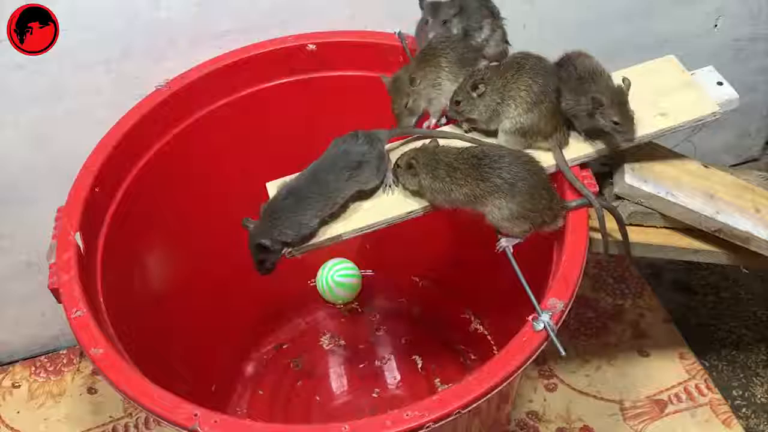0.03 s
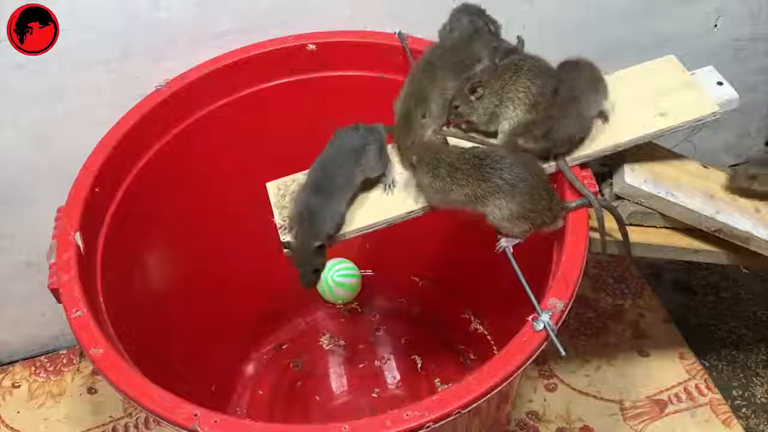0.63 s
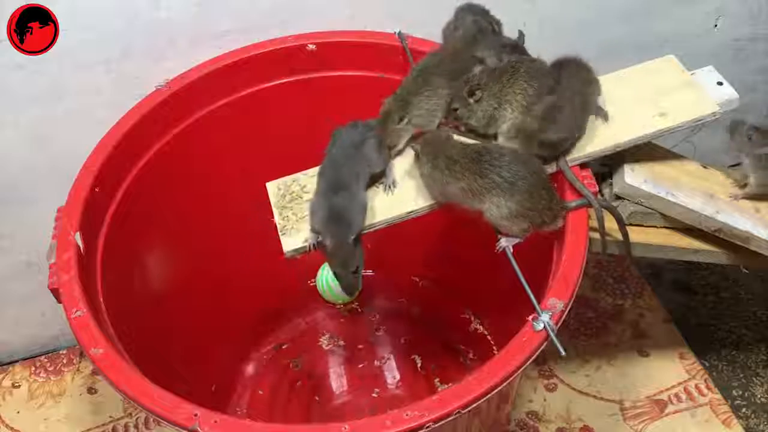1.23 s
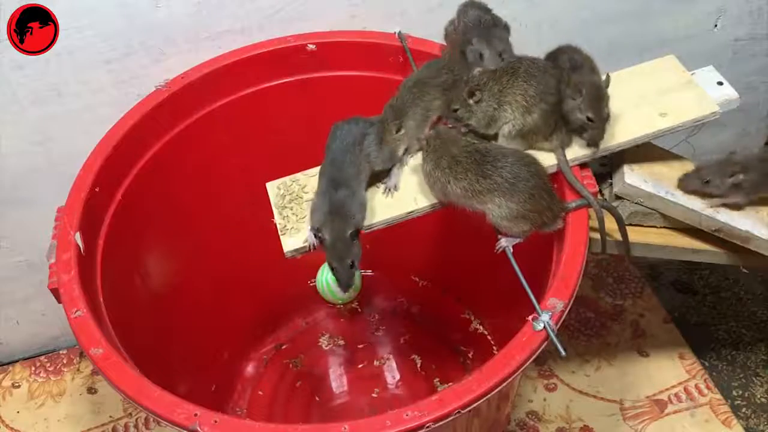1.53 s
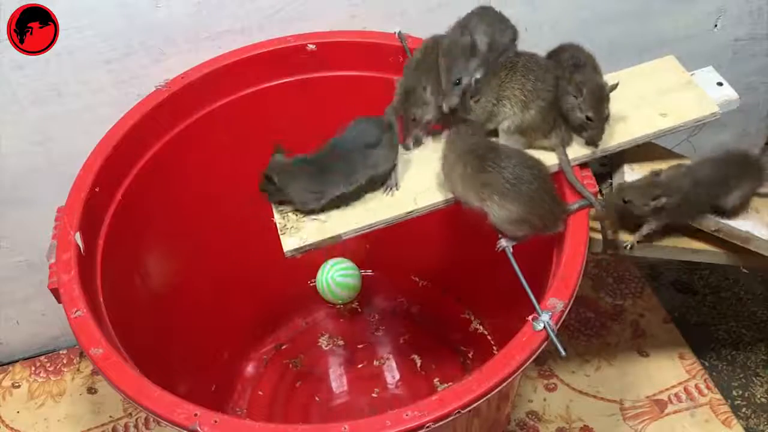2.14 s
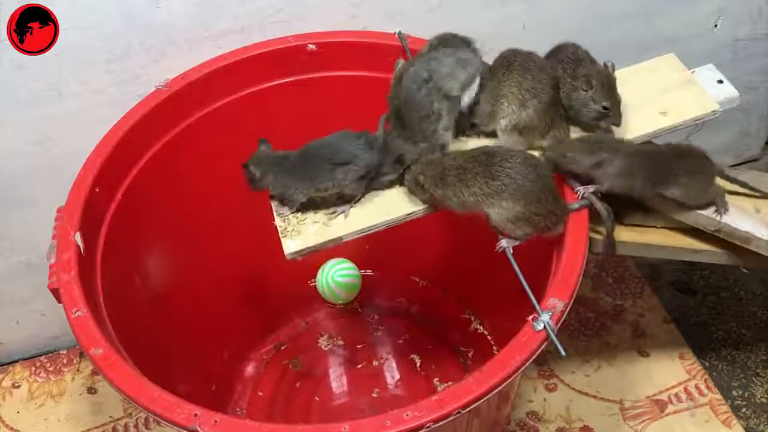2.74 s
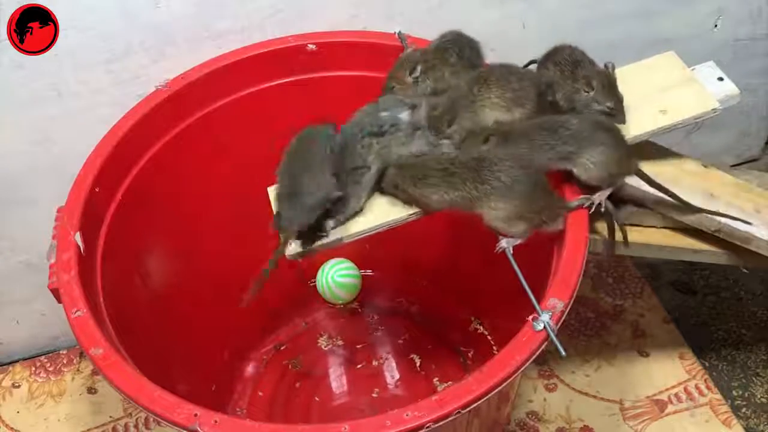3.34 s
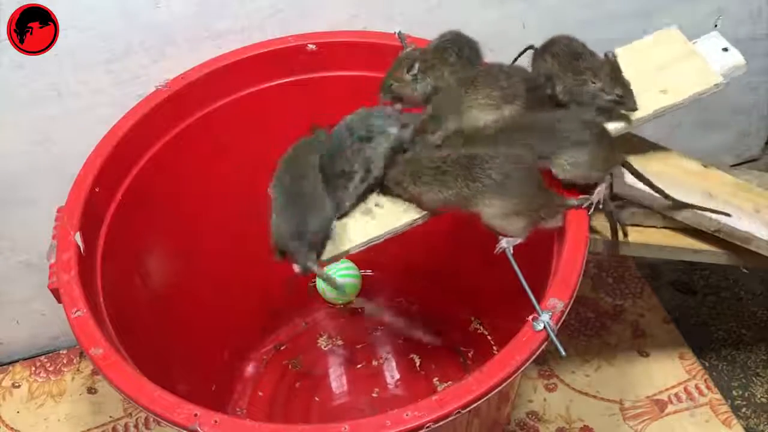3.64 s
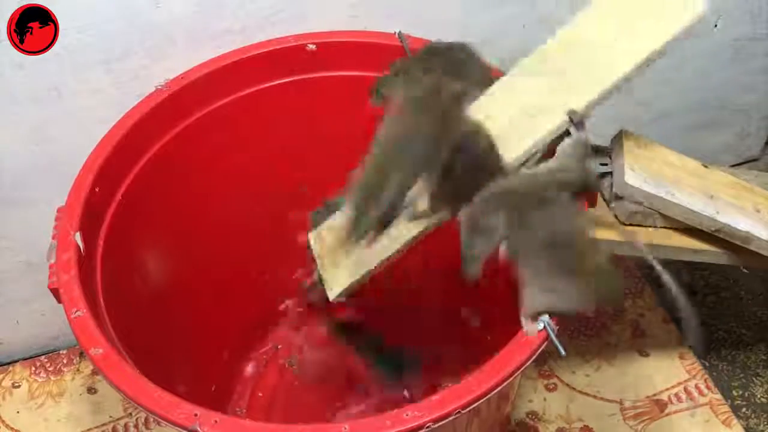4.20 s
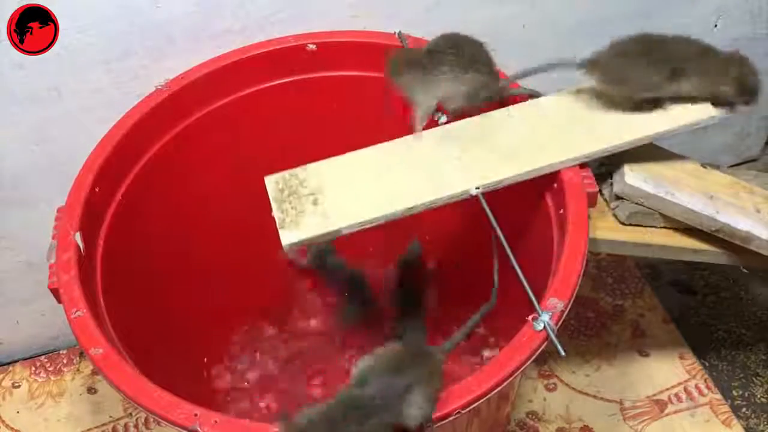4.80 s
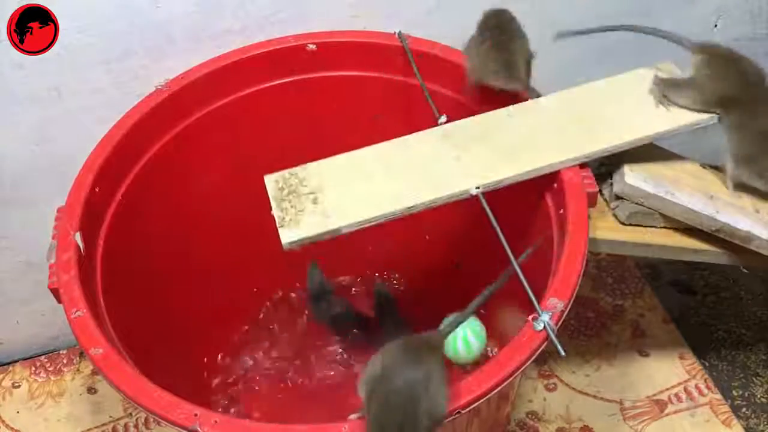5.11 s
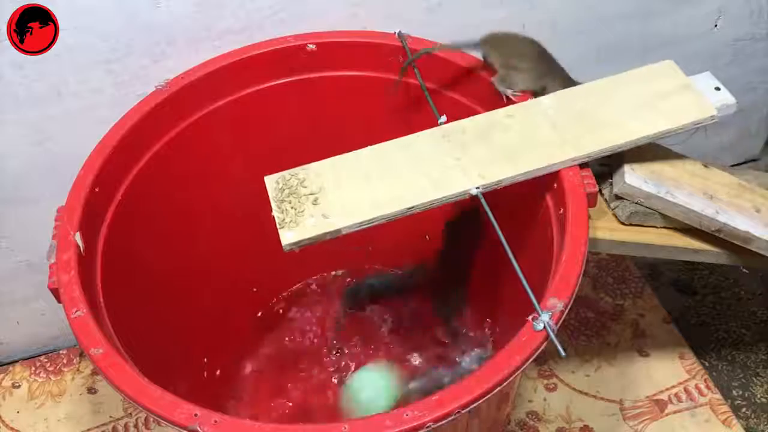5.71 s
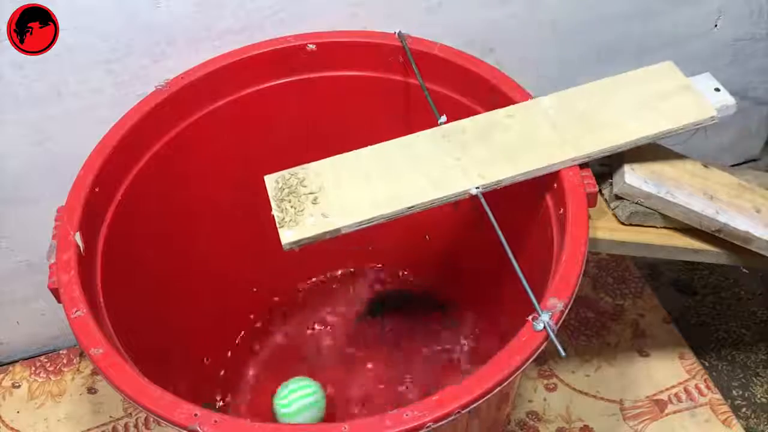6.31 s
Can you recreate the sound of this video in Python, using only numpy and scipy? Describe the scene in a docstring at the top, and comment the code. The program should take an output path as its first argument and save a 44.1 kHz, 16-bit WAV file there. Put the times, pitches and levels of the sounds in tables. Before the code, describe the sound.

Rats patter and scuffle faintly on a wooden plank, their claws ticking over the low rumble of a small room. About four seconds in, the plank tips with a short, bright scrape and they plunge into shallow water in a plastic bucket, thumping the bottom. After a brief lull they keep paddling, with slaps, spray, bubbles and a hollow slosh, heard from close by.

```python
"""Over the low rumble of a small room, rats patter and scuffle on a wooden plank above a plastic bucket.
At about 4 s the plank tips and they scrape down it, then plunge into shallow water and thump the bottom.
They lull briefly after 5 s, then paddle to the end: slaps, spray, ringing bubbles and a hollow slosh,
all thrown back by the bucket's wall."""
import sys
import numpy as np
from scipy import signal
from scipy.io import wavfile
from scipy.ndimage import uniform_filter1d

SR = 44100
rng = np.random.default_rng(int(sys.argv[2]) if len(sys.argv) > 2 else 0)


def to_wav(sig):
    """Store sig (one row per channel, or 1-D mono) as 16-bit WAV at the path in sys.argv[1].

    Samples outside -1..1 are clipped; the rate is SR.
    """
    pcm = np.clip(np.atleast_2d(sig), -1, 1) * 32767
    pcm = np.round(pcm).astype(np.int16)
    wavfile.write(sys.argv[1], SR, pcm.T)  # frames by channels


N = 280035
TIME = np.arange(N) / SR


def amp(db):
    """Decibels to gain."""
    return 10 ** (np.asarray(db) / 20)


def unit(x):
    """Scales to rms 1."""
    return x / np.sqrt(np.mean(x ** 2) + 1e-20)


def read(points, hz):
    """Reads a curve on a log-frequency axis."""
    f, value = np.transpose(points)
    return np.interp(np.log(hz + 1), np.log(f), value)


def fader(rows):
    """Gain over time from a dB curve; silent before the first row, held after the last."""
    s, db = np.transpose(rows)
    return amp(np.interp(TIME, s, db, left=-np.inf))


def add(mix, s, sound):
    """Mixes a sound in at time s."""
    part = mix[max(round(s * SR), 0):][:len(sound)]
    part += sound[:len(part)]


def eq(x, curve, size=4096):
    """Minimum-phase EQ, so that clicks keep their sharp attacks."""
    hz = abs(np.fft.fftfreq(size, 1 / SR))
    log_gain = np.log(amp(np.maximum(read(curve, hz), -100)))
    taps = np.fft.ifft(np.exp(np.conj(signal.hilbert(log_gain)))).real[:size // 2]
    return signal.oaconvolve(x, taps)[:len(x)]


def band(x, low_hz, high_hz, order=2):
    """Band-pass filter."""
    edges = np.clip([low_hz, high_hz], 2, SR / 2 - 100)
    return signal.sosfilt(signal.butter(order, edges, "band", fs=SR, output="sos"), x)


def impacts(size, per_s, spread_db):
    """A random train of tiny impacts of uneven strength."""
    strength = amp(spread_db * np.minimum(rng.exponential(1, size), 4))
    return strength * rng.choice([-1, 1], size) * (rng.random(size) < per_s / SR)


def steady(x, size=2200):
    """Rides a texture to rms 1 while keeping its fine grain."""
    return x / np.sqrt(abs(uniform_filter1d(x ** 2, size)) + 1e-12)


def flutter(depth_db, rate_hz):
    """A random tremolo gain that breaks a texture into clumps."""
    return amp(depth_db * np.tanh(unit(band(rng.standard_normal(N), rate_hz / 4, rate_hz))))


def patchy(x, depth_db, size):
    """Uneven gain over time and pitch, so that each grain stands out at a pitch of its own."""
    spectra = signal.stft(x, nperseg=size)[2]
    across_pitch = uniform_filter1d(rng.standard_normal(spectra.shape), size=5, axis=0)
    patches = unit(uniform_filter1d(across_pitch, size=3))
    return signal.istft(spectra * amp(depth_db * patches), nperseg=size)[1][:N]


def wake(hits, db, settle_s):
    """Power envelope of what settles after each hit, in proportion to its energy."""
    power, t = np.zeros(N), np.arange(SR) / SR
    settling = ((1 - np.exp(-t / 0.0069)) * np.exp(-t / settle_s)) ** 2 / settle_s
    for s, hit_db, decay_s, _ in hits:
        add(power, s, amp(hit_db + db) ** 2 * decay_s * settling)
    return power


# EQ of the room's hiss: f/Hz, level/dB
ROOM_EQ = [(20, -26), (45, -3), (70, 3.5), (110, -17), (200, -9.5), (450, -24), (3000, -30), (4500, -32),
           (4900, -38), (10500, -40.5), (16000, -39.5)]
# Quick fade-in of room and plank: t/s, level/dB
FADE_IN = [(.11, -106), (.14, -1)]
def room_tone():
    """The bed: faint hiss, a wavering low rumble and a soft drone at the bucket's lowest mode."""
    hiss = amp(-60) * unit(eq(rng.standard_normal(N), ROOM_EQ))
    rumble = amp(-57.5) * steady(band(rng.standard_normal(N), 43, 50.7), size=11000)
    drone = amp(-76) * unit(band(rng.standard_normal(N), 190, 202))
    return fader(FADE_IN) * (hiss + rumble + drone)


# Reverb time of the room: f/Hz, t60/s
ROOM_DECAY = [(150, 0.19), (1500, 0.23), (5000, 0.25), (15000, 0.19)]
# Early reflections off the bucket's wall: t/s, gain
WALL_TAPS = [(.0027, -0.029), (.0046, -0.2), (.0092, -.2), (0.0117, 0.19)]
def space(x, wall_db, room_db):
    """A few quick echoes off the bucket's wall, then the room's short tail."""
    hz, t, spectra = signal.stft(rng.standard_normal(SR // 2), SR, nperseg=256)
    decay = amp(-60 * t / read(ROOM_DECAY, hz)[:, None])
    tail = signal.istft(spectra * decay * np.minimum(t / .006, 1), SR, nperseg=256)[1]
    response = amp(room_db) * tail / np.linalg.norm(tail)
    for s, gain in WALL_TAPS:
        add(response, s, amp(wall_db) * gain * np.array([.2, .7, .2]))
    return x + signal.oaconvolve(x, response)[:N]


# Resonances of the bucket's air and wall: f/Hz, level/dB, t60/s
BUCKET_MODES = [(198.7, -0.5, 0.3), (214, 8, 0.044), (282.7, -5, 0.24), (365, -5, 0.27), (577.3, 0.5, 0.17),
                (790, -0.5, 0.11), (1197, 10, 0.068), (1537, 6, 0.14)]
def bucket_ring():
    """The bucket's modes ring out after one blow."""
    t = np.arange(SR // 3) / SR
    return sum(amp(db - 60 * t / t60) * np.cos(2 * np.pi * hz * t) for hz, db, t60 in BUCKET_MODES)


def hollow(x, ring_db):
    """Adds the ringing of the bucket to a sound inside it."""
    ring = bucket_ring()
    return x + amp(ring_db) * signal.oaconvolve(x, ring / np.linalg.norm(ring))[:N]


# Rubs on the plank: t/s, level/dB, decay/s, rasp f/Hz
RUB_CUES = [(0.593, -72.5, 0.044, 4000), (1.49, -69.5, 0.11, 1800), (1.761, -73.5, 1, 2070),
            (2.179, -72, 0.15, 2550), (2.349, -75.5, 0.35, 2920), (2.6, -74.5, 0.61, 614),
            (2.851, -63.5, 0.37, 2800), (3.13, -70.5, 0.67, 2760), (3.35, -64, 0.41, 1650)]
def scuffle():
    """Fur and feet catch on the grain of the wood: a focused rasp with coarser, bright grit."""
    out, t = np.zeros(N), np.arange(SR * 2 // 3) / SR
    for s, db, decay_s, hz in RUB_CUES:
        rasp = unit(band(impacts(len(t), per_s=6300, spread_db=-4), hz * 0.7, hz * 1.23))
        grit = steady(band(impacts(len(t), per_s=3100, spread_db=-0.5), 910, 3500, order=1))
        envelope = np.minimum(t / 0.0093, 1) * np.exp(-t / decay_s) * (1 - t / t[-1])
        add(out, s, amp(db) * (1.72 * rasp + amp(3) * grit) * envelope)
    return out * flutter(depth_db=2, rate_hz=45)


def rustle():
    """Whiskers, fur and toes brush about: fine, uneven grit, stronger while the rats scuffle."""
    grit = patchy(impacts(N, per_s=200, spread_db=4), depth_db=4, size=512)
    envelope = np.sqrt(amp(-75) ** 2 + wake(RUB_CUES, db=-11, settle_s=0.26))
    return unit(band(grit, 1800, 18000, order=1)) * envelope


# Fader ride of the slide: t/s, level/dB
SLIDE_RIDE = [(4.03, -57.5), (4.06, -53), (4.14, -56.5), (4.165, -44), (4.3, -54.5), (4.4, -71.5)]
# EQ of the scrape: f/Hz, level/dB
SLIDE_EQ = [(300, -0.5), (1700, 2.5), (4300, 1), (8000, -3), (16000, -11)]
def slide():
    """Claws and fur drag down the tilting plank: a dense, bright scrape."""
    grains = patchy(impacts(N, per_s=2200, spread_db=1.5), depth_db=4, size=512)
    return fader(SLIDE_RIDE) * (TIME < SLIDE_RIDE[-1][0]) * steady(eq(grains, SLIDE_EQ))


# Ticks on the plank: t/s, level/dB, wood f/Hz, snap trim/dB
TICK_CUES = [(.226, -46.5, 2950, -13), (.316, -57.5, 3020, 6), (.663, -43, 2800, 6.5),
             (0.843, -43.5, 1720, -7), (.961, -38, 1600, -5), (1.057, -44.5, 1680, -18),
             (1.136, -50, 2560, -6), (1.157, -38, 1700, -10), (1.182, -53, 1950, 12.5),
             (1.261, -41, 1610, -15), (1.27, -41.5, 1690, -2), (1.387, -41.5, 1680, 0),
             (1.407, -42, 1820, 5.5), (1.452, -59, 2000, 9), (1.599, -51, 2300, -12),
             (1.632, -42.5, 1610, 8.5), (1.735, -41.5, 1700, -2), (1.855, -49.5, 3080, -7),
             (1.980, -53.5, 2140, 13), (2.035, -48, 5600, -9), (2.166, -52, 2600, 0),
             (2.454, -50.5, 3000, 4), (2.491, -44, 2700, -3), (2.705, -37, 1780, -1),
             (2.827, -40, 1230, -11), (2.935, -44, 3780, -11), (3.097, -48.5, 4700, 0),
             (3.157, -49, 2980, -1), (3.234, -53, 4370, 12), (3.322, -43.5, 4300, -1),
             (3.369, -49.5, 6000, 4), (3.482, -35.5, 3430, -15), (3.594, -48.5, 2770, 4.5),
             (3.923, -44.5, 3120, 6.5), (3.985, -47, 2560, 4), (4.15, -45, 1680, 20)]
def claws():
    """Claws and teeth tick on the plank: a sharp snap and a few cycles of dead wood."""
    out, t = np.zeros(N), np.arange(SR // 25) / SR
    for s, db, hz, snap_db in TICK_CUES:
        wood = np.exp(-t / 0.0011) * np.sin(2 * np.pi * hz * t)
        body = band(rng.standard_normal(len(t)), hz * 0.56, hz * 1.59) * np.exp(-t / 0.0068)
        crack = rng.standard_normal(len(t)) * (np.exp(-t / .00025) + .14 * np.exp(-t / .005))
        snap = band(crack, 4000, 13000, order=1)
        add(out, s, amp(db) * (wood + 0.94 * body + amp(snap_db) * 3 * snap / np.linalg.norm(snap)))
    return band(out, 1100, 20000)


def bubble(hz, swell_s, rise=12):
    """A pocket of air swells into ringing and dies, gliding by `rise` octaves a second."""
    t = np.arange(0, 7 * swell_s, 1 / SR)
    pitch = np.minimum(hz * 2 ** (rise * t), SR / 2)
    envelope = t / swell_s * np.exp(1 - t / swell_s)
    return envelope * np.sin(2 * np.pi * np.cumsum(pitch) / SR)


# How hard the rats stir the water (plunge, lull, paddling): t/s, level/dB
EFFORT_RIDE = [(4.28, -57), (4.34, -46), (4.44, -49.5), (4.53, -38.5), (4.69, -42), (4.79, -38.5),
               (4.94, -45.5), (5.15, -49), (5.22, -55), (5.35, -54), (5.51, -51), (5.66, -42.5),
               (5.78, -45), (6.04, -47), (6.11, -51), (6.165, -44), (6.23, -50.5), (6.35, -53)]
def stirred(db, slope, paddle_db=-45):
    """Power envelope of a layer: at db when the effort is paddle_db, gaining slope dB per dB of effort."""
    return (amp(db) * (fader(EFFORT_RIDE) / amp(paddle_db)) ** slope) ** 2


def bubble_cloud(low_hz, high_hz, cycles, spread_db, count):
    """Many bubbles of random size while the water is stirred; small ones are higher and shorter."""
    out, first = np.zeros(N + SR), round(EFFORT_RIDE[0][0] * SR)
    for hz in np.geomspace(low_hz, high_hz, 100):
        swell_s = cycles / hz * 2 ** rng.uniform(-0.9, 1)
        ring = bubble(hz, swell_s, rise=0.035 * rng.random() / swell_s) * hz / high_hz
        starts = rng.integers(first, N, count // 100)
        gains = amp(spread_db * np.minimum(rng.exponential(1, len(starts)), 4))
        for at, gain in zip(starts, gains):
            out[at:at + len(ring)] += gain * ring
    return out[:N]


# Swells of spray: peak t/s, level/dB, half length/s
SHEET_CUES = [(4.35, -46.5, 0.12), (4.55, -40.5, 0.038), (4.755, -38.5, 0.048), (5.634, -39, 0.012),
              (5.893, -45.5, 0.16)]
def sheets():
    """Power envelope of the sheets of spray thrown up by a falling body or a hard kick."""
    return sum(amp(db) ** 2 * np.exp(-((TIME - s) / half_s) ** 2) for s, db, half_s in SHEET_CUES)


# EQs of the low heave, the midrange churn and the bright spray: f/Hz, level/dB
HEAVE_EQ = [(60, -54), (140, -7), (190, 0), (330, -6.5), (560, -2.5), (750, -12), (2500, -54.5)]
CHURN_EQ = [(300, -21), (650, 5.5), (1250, 6), (3200, 1), (9000, -48)]
SPRAY_EQ = [(1100, -7.5), (4300, -4), (7000, -7.5), (10400, -11), (15500, -11.5)]
def thrashing():
    """Paddling heaves big cavities, churns up small bubbles and throws spray that lands in clumps."""
    heave = eq(bubble_cloud(145, 1086, cycles=0.8, spread_db=3, count=1600), HEAVE_EQ)
    churn = eq(bubble_cloud(575, 7180, cycles=3, spread_db=4, count=3500), CHURN_EQ)
    spray = eq(patchy(impacts(N, per_s=6000, spread_db=1.5), depth_db=5.5, size=128), SPRAY_EQ)
    fizz = eq(bubble_cloud(2200, 9000, cycles=2.8, spread_db=4, count=2500), SPRAY_EQ)
    top = amp(-0.5) * steady(spray) + amp(-5) * steady(fizz)
    # A thump leaves the water heaving; a slap leaves bubbles and falling drops.
    heave_gain = np.sqrt(stirred(-48.5, slope=1.39) + wake(THUMP_CUES, -11.5, settle_s=0.045))
    churn_gain = np.sqrt(stirred(-44.5, slope=1) + wake(SLAP_CUES, -9, settle_s=0.035))
    top_gain = np.sqrt(stirred(-49.5, slope=0.56) + wake(SLAP_CUES, -14, settle_s=0.028) + sheets())
    return (heave_gain * steady(hollow(heave, ring_db=-16), size=1500)
            + churn_gain * steady(churn, size=2400)
            + top_gain * flutter(depth_db=3.5, rate_hz=62) * top)


# Single drops landing: t/s, level/dB
DROP_CUES = [(4.324, -34), (4.333, -21), (4.3443, -23), (4.404, -27), (4.4918, -24.5), (4.5332, -25),
             (4.6702, -26.5), (4.6993, -25), (5.2945, -37.5), (5.3733, -34), (5.623, -29), (5.7651, -19.5),
             (5.7946, -34), (5.831, -27), (5.9675, -25.5), (6.0173, -25.5), (6.0423, -30), (6.2528, -28.5)]
def drops():
    """A flung drop bursts on water or plastic with a sharp crack, a tiny ping and a brief spatter."""
    out, t = np.zeros(N), np.arange(SR // 30) / SR
    envelope = np.exp(-t / 0.0009) + 0.16 * np.exp(-t / 0.008)
    for s, db in DROP_CUES:
        burst = band(rng.standard_normal(len(t)) * envelope, 4200, 14000, order=1)
        add(out, s, amp(db) * burst / abs(burst).max())
        add(out, s, amp(db - 5) * bubble(rng.uniform(5500, 9500), swell_s=.0005))
    return out


# Knocks on the bucket: t/s, level/dB, decay/s, high cut f/Hz
THUMP_CUES = [(4.15, -47.5, 0.044, 496), (4.312, -37, 0.0045, 517), (4.573, -17.5, 0.015, 1680),
              (4.582, -22, 0.022, 630), (4.778, -28.5, 0.03, 1090), (4.86, -41, 0.065, 450),
              (5.029, -43.5, 0.094, 614), (5.626, -34, 0.013, 493), (5.805, -41, 0.013, 405),
              (5.903, -42, 0.029, 544), (6.034, -38, 0.015, 404), (6.163, -39, 0.0065, 408)]
def thumps():
    """Plank and bodies land soft, dull blows on the plastic; each sets the bucket ringing."""
    out, ring = np.zeros(N), bucket_ring()
    t = np.arange(len(ring)) / SR
    attack = 1 - np.exp(-t / 0.0022)
    for s, db, decay_s, hz in THUMP_CUES:
        thud = band(rng.standard_normal(len(t)), min(236, hz * 0.41), hz, order=5)
        blow = steady(thud, size=300) * np.exp(-t / decay_s)
        add(out, s, amp(db) * (blow + amp(-7.5) * band(ring, 71, hz)) * attack)
    return band(out, 115, 6000)  # the bucket radiates little below its lowest mode


# Featured bubbles: t/s, level/dB, f/Hz, swell/s, glide/(octaves/s)
PLOP_CUES = [(4.3752, -20, 1370, 0.001, -61), (4.453, -32, 594, 0.0045, 37.5),
             (4.466, -31.5, 952, 0.0043, 48), (4.488, -29, 2200, 0.00083, 27),
             (4.55, -20.5, 1490, 0.001, 33), (4.572, -19, 1510, 0.0032, 3), (4.577, -24.5, 527, 0.0031, 5),
             (4.642, -31.5, 1666, 0.0043, 2), (4.756, -30.5, 1435, 0.0023, 14),
             (4.973, -36, 1285, 0.0032, 12), (4.998, -29.5, 1050, 0.0026, 47),
             (5.018, -22, 2830, 0.002, 10), (5.085, -31, 3020, 0.0017, 24), (5.129, -27, 900, 0.00076, 9),
             (5.185, -30.5, 715, 0.00072, -4), (5.537, -36, 406, 0.0046, 23),
             (5.561, -32, 1072, 0.006, 1.5), (5.627, -33.5, 542, 0.011, 9.5),
             (5.795, -28.5, 1020, 0.0021, -3), (5.822, -32.5, 1540, 0.0046, 30.5),
             (5.882, -38, 1220, 0.0025, 0), (5.908, -38, 1303, 0.0077, -1), (5.910, -35, 590, 0.0029, 31),
             (5.955, -43, 1236, 0.0027, 1), (6.031, -37.5, 1270, 0.0067, 4.5),
             (6.326, -24, 1925, 0.0018, -6)]
def plops():
    """The large bubbles trapped by bodies and paws; the choppy surface makes their ring flutter."""
    out = np.zeros(N)
    for s, db, hz, swell_s, rise in PLOP_CUES:
        add(out, s, amp(db) * bubble(hz, swell_s, rise))
    return out * flutter(depth_db=2.5, rate_hz=195)


# Hits on the water: t/s, level/dB, decay/s, splash centre f/Hz
SLAP_CUES = [(4.324, -26.5, 0.0022, 6840), (4.336, -30, 0.014, 5300), (4.371, -24.5, 0.0026, 2740),
             (4.42, -34, 0.0056, 2340), (4.507, -33.5, 0.007, 3000), (4.547, -21, 0.0071, 4080),
             (4.671, -31.5, 0.0043, 3650), (4.697, -41.5, 0.031, 7200), (4.752, -21.5, 0.0058, 2700),
             (4.874, -32.5, 0.0036, 3270), (5.019, -21.5, 0.0041, 3270), (5.084, -39, 0.016, 2900),
             (5.13, -33, 0.0076, 2720), (5.225, -34.5, 0.0035, 4730), (5.371, -47, 0.053, 4370),
             (5.440, -31, 0.014, 2260), (5.478, -40.5, 0.034, 2940), (5.536, -29.5, 0.0081, 3300),
             (5.553, -36, 0.013, 8000), (5.623, -36.5, 0.02, 3270), (5.675, -32, 0.0083, 2400),
             (5.833, -31, 0.01, 2750), (5.902, -33.5, 0.015, 2020), (5.952, -28, 0.0062, 2910),
             (6.010, -32, 0.011, 3560), (6.137, -31, 0.012, 2510), (6.285, -33.5, 0.018, 2450),
             (6.324, -31.5, 0.017, 3900)]
def slaps():
    """A body or paw slaps up a short crackle of droplets around one pitch and traps a bubble there."""
    out, t = np.zeros(N), np.arange(SR // 8) / SR
    attack = 1 - np.exp(-t / 0.0008)
    for s, db, decay_s, hz in SLAP_CUES:
        noise = rng.standard_normal(len(t))
        splatter = unit(band(noise, 600, 18000))
        burst = unit(band(noise, hz * 0.43, hz * 1.53)) + amp(-7.5) * splatter
        add(out, s, amp(db) * steady(burst, size=300) * attack * np.exp(-t / decay_s))
        add(out, s, amp(db - 4) * bubble(hz, swell_s=3.5 / hz))
    return out


def scene():
    """The mono mix: the plank above, the water down in the bucket, and the room."""
    plank = fader(FADE_IN) * space(claws() + rustle() + scuffle() + slide(), wall_db=-8, room_db=-8.5)
    water = thrashing() + hollow(slaps() + plops(), ring_db=-21) + drops() + thumps()
    return (plank + space(water, wall_db=-8.5, room_db=-10.5) + room_tone())[None]


def record(dry):
    """A steep high cut at 16.1 kHz on the whole mix."""
    taps = signal.firwin(401, 16100, window=("kaiser", 8), fs=SR)
    return signal.oaconvolve(dry, taps[None], "same", axes=1)


dry = scene()
out = record(dry)
to_wav(out)
```